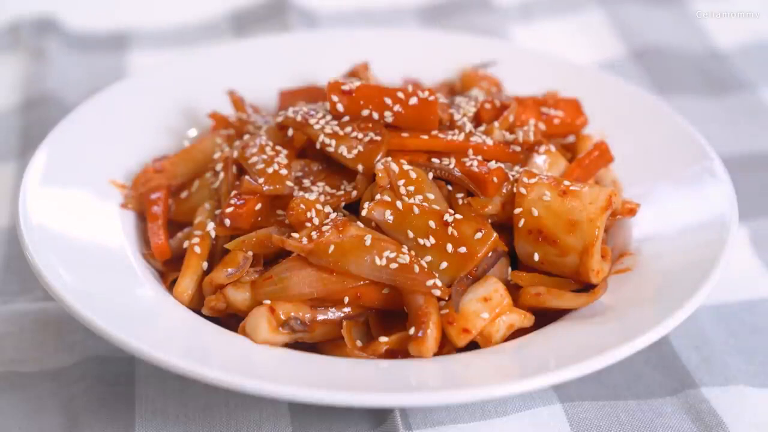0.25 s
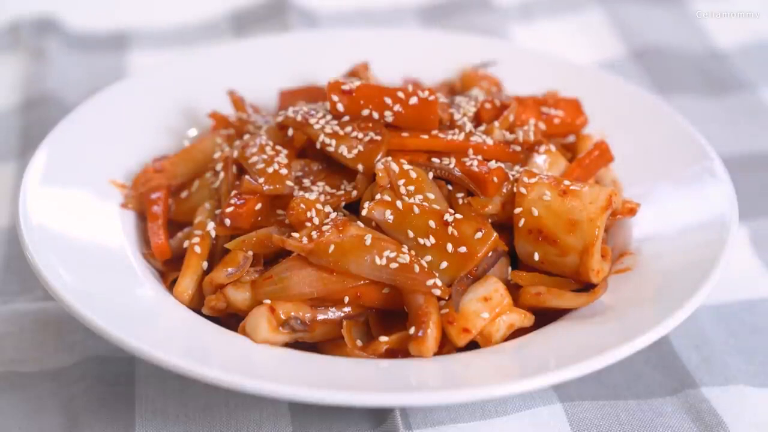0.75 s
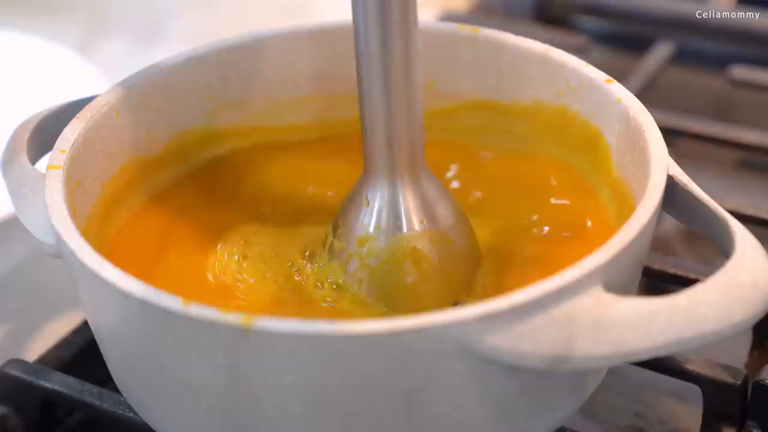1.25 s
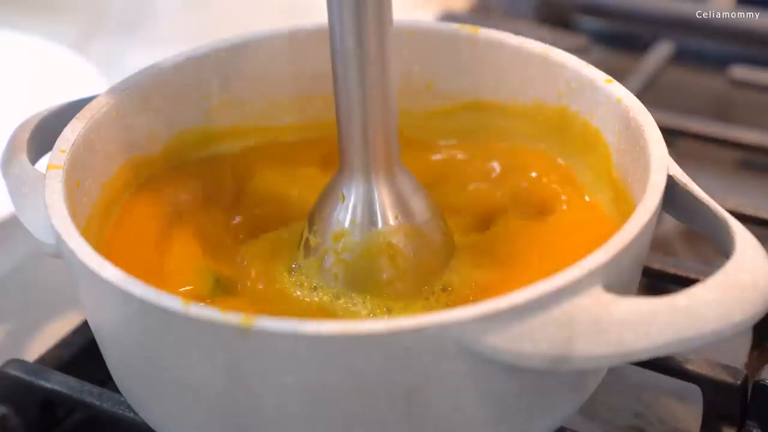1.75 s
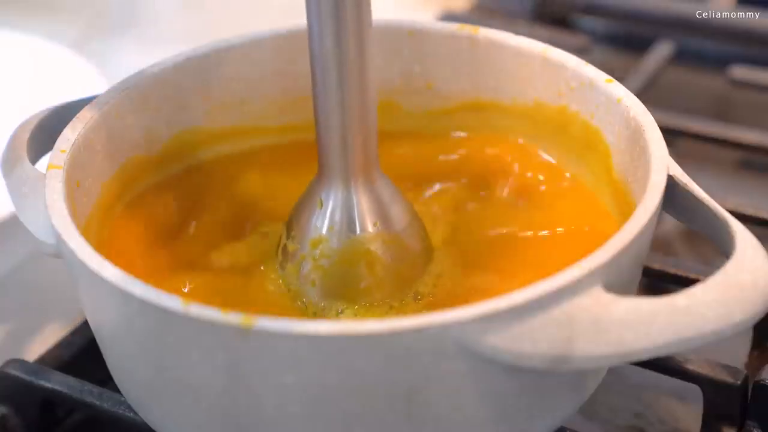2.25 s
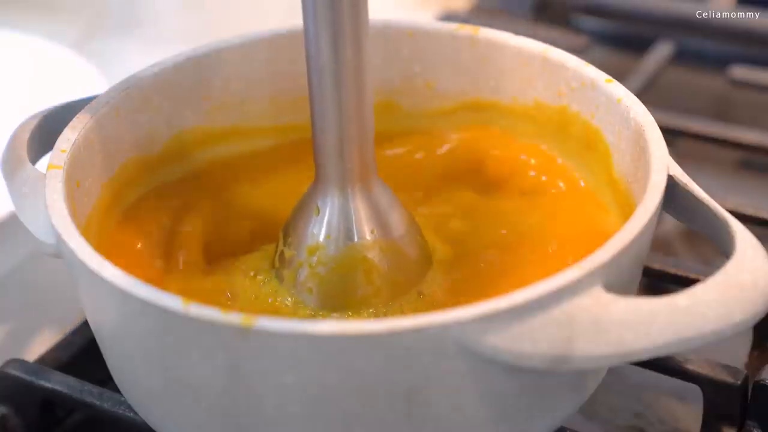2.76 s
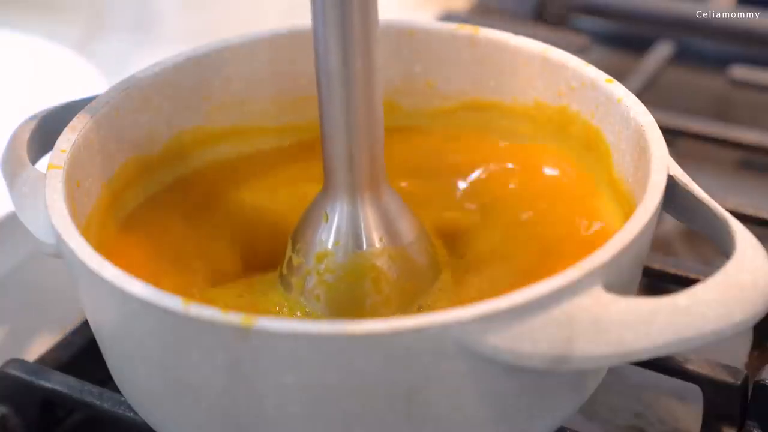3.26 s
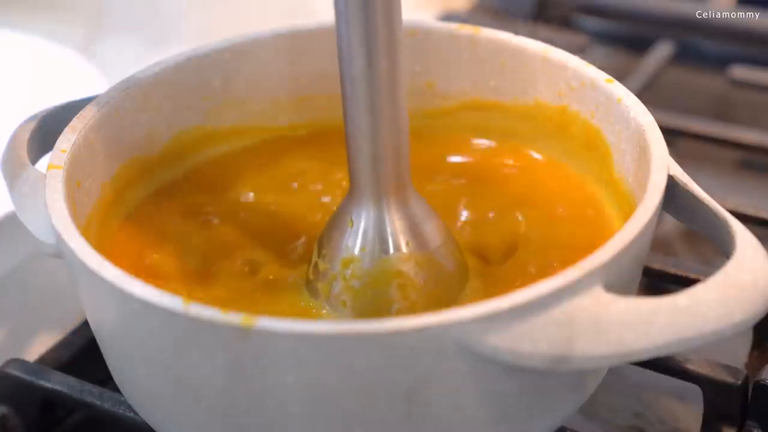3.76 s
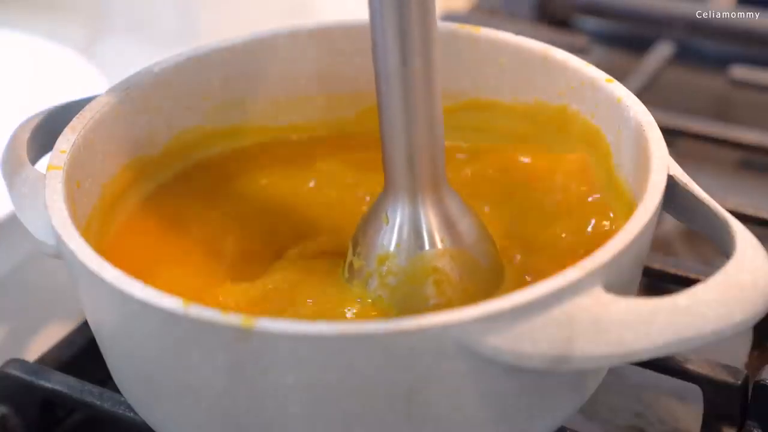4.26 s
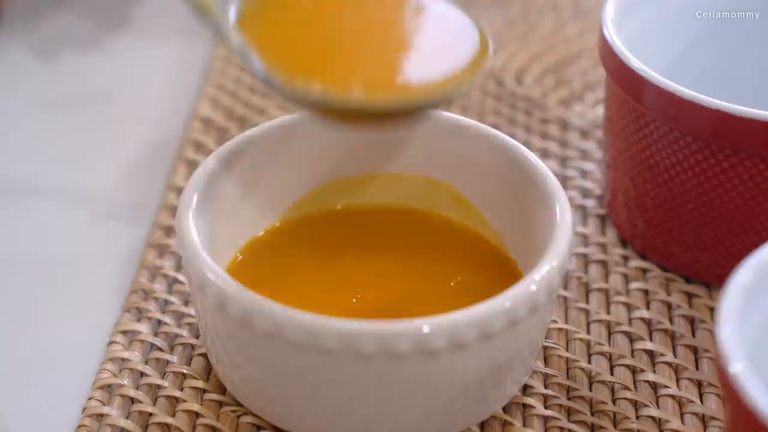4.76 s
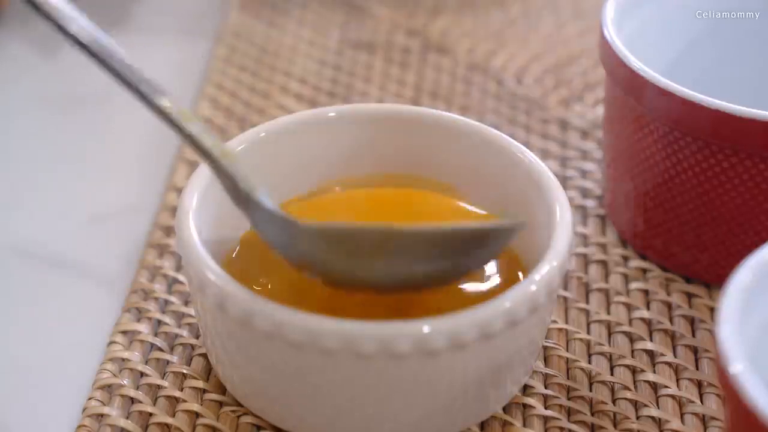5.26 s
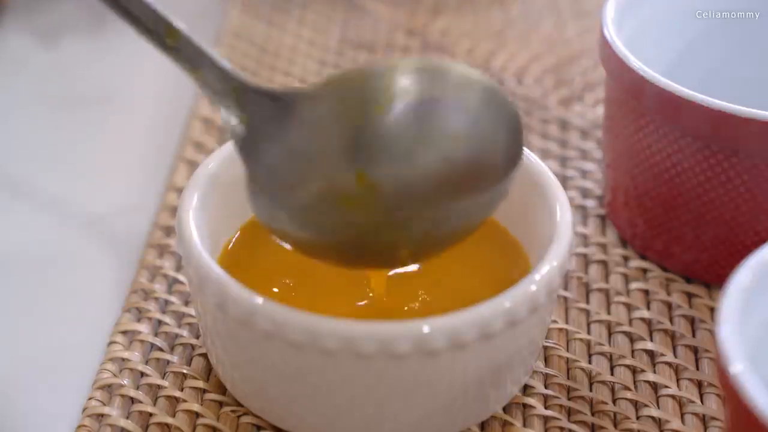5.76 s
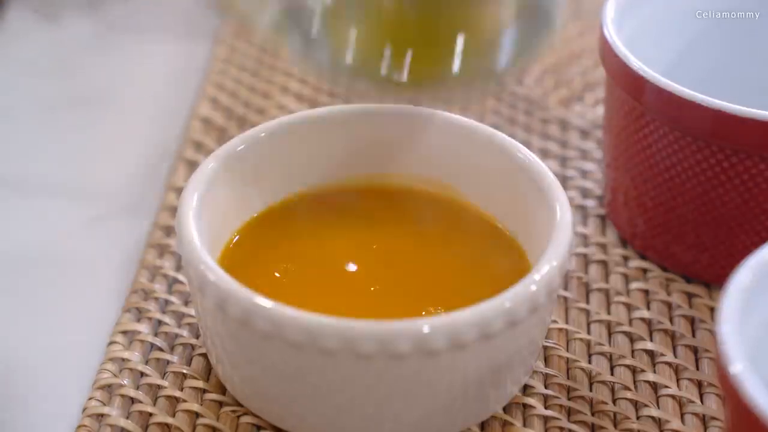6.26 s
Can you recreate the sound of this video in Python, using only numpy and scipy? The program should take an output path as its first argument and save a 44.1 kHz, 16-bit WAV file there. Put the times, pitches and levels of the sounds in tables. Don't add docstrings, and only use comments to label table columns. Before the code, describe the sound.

A hushed room gives way suddenly to a steady blender roar in a pot, which cuts off to humming room noise, light sizzle and pouring drips.

```python
import sys
import numpy as np
from scipy import signal
from scipy.fft import rfft, irfft, next_fast_len
from scipy.io import wavfile

SR = 44100
rng = np.random.default_rng(int(sys.argv[2]) if len(sys.argv) > 2 else 0)


def store_wav(level_fs):
    pcm = np.round(np.clip(np.atleast_2d(level_fs), -1, 1) * 32767)
    wavfile.write(sys.argv[1], SR, pcm.T.astype(np.int16))


def elevation(decibels):
    levels = np.asarray(decibels, float)
    return 10 ** (levels / 20)


N = 287388
TIME = np.arange(N) / SR
START_S, STOP_S = 1.3468, 4.6005

# hz, likeness of left and right (-1 to 1); then hz, left_over_right_db
ROOM_LIKENESS = [(60, 1.0), (130, 0.99), (290, 0.97), (640, 0.71), (1410, 0.31), (3100, -0.13),
                 (6820, -0.06), (15000, 0.05)]
ROOM_BALANCE = [(60, 0.0), (150, -0.5), (380, -1.0), (950, -2.0), (2380, -2.0), (5980, -2.5), (15000, -3.0)]
# hz, level_db per Hz
QUIET_COLOUR = [(25, -48), (42, -25), (60, -9), (80, -19), (150, -14), (215, -4.5), (310, -4), (450, -8),
                (900, -6.5), (1400, -12), (2100, -16), (4000, -19), (8000, -21.5), (15000, -27)]
# pitch_hz, level_db
QUIET_TONES = [(129.2, -79), (209.9, -72), (236.9, -84), (317.6, -72.5), (597.5, -88), (753.7, -78),
               (1039, -76.5), (1130, -86), (1545, -82), (2024, -87), (4581, -84), (6245, -91)]
# start_s (middle of burst), level_db,
# pitch_hz, width_hz,
SPITS = [(.783, -55, 4900, 1800, .004), (2.2975, -31, 10400, 5000, 0.0023), (2.3, -56, 15100, 1200, 0.037),
         (1.97, -64, 14900, 500, .03), (2.96, -67, 15500, 500, .02), (4.1, -64, 14900, 500, .02),
         (4.23, -62, 14900, 500, .04), (4.3, -67, 15600, 300, .03), (4.44, -38, 9000, 3000, 0.015),
         (5.458, -42, 3200, 2000, .002), (5.5665, -32, 4900, 2600, 0.0022), (6.49, -41, 1250, 600, 0.012),
         (4.91, -48, 8800, 1500, 0.055), (5.39, -41, 6700, 1200, 0.015), (6.07, -44, 7400, 1200, 0.014),
         (6.309, -46, 2600, 1500, 0.082)]
# start_s, peak_db, pitch_hz, t60_s
TICKS = [
    (1.346, -44, 45, 0.037),
    (5.124, -38, 2950, .025),
    (5.456, -30, 2800, 0.013),
    (5.566, -25, 4140, 0.0065),
    (6.478, -31, 1180, 0.023),
    (6.4815, -32, 1200, 0.035),
    (6.489, -30, 1120, .025),
    (6.502, -35, 1030, 0.018),
]

# time_s, speed in turns per s
SHAFT_SPEED = [(1.347, 95.5), (1.72, 95.62), (1.9, 95.25), (2.12, 95.56), (2.3, 95.25), (2.4, 94.88),
               (2.85, 94.58), (3.62, 95.38), (3.84, 96.14), (4.02, 95.95), (4.2, 95.15), (4.4, 95.65),
               (4.6, 95.7)]
# time_s, lean (0-1)
LEAN = [
    (1.347, .25),
    (2.3, .3),
    (2.55, .0),
    (3.0, .08),
    (3.3, .6),
    (3.55, .95),
    (4.6, .95),
]
MULTIPLES = (3, 5, 6, 7, 10, 12, 24, 26, 27, 46, 49, 50, 53, 54, 56, 59, 62, 66, 67, 76, 86, 96, 97, 107,
             120, 144)
MULTIPLE_DB = (-41, -49, -42, -43, -47, -40, -49, -52, -50, -54, -53, -56, -52, -56, -60, -58, -58, -62,
               -59, -63, -65, -58, -61, -64, -62, -66)
LEADING = (4, 47, 48, 72)
# time_s, level_db
GULPS = [
    (2.44, -10),
    (2.9, -8.5),
    (3.7, -6.5),
    (4.18, -3),
    (4.43, -3),
]
# hz, level_db per Hz
CHURN_COLOUR = [(30, -70), (55, -42.5), (150, -36.5), (235, -13.5), (520, -10.5), (610, -12.5), (700, -0.5),
                (1000, -5.5), (1800, -7.5), (3300, -10.5), (3900, -19.5), (6000, -19), (9000, -25),
                (11400, -30.5), (12300, -33), (13900, -31.5)]
# pitch_hz, width_hz, level_db
POT = [(240, 15, 4), (390, 35, 4.5), (730, 86, -8), (835, 39, 6), (1200, 130, 4), (1556, 76, 7),
       (3357, 74, 1.5), (4370, 870, 2), (7050, 160, -0.5), (9620, 560, -0.5), (11100, 300, -2)]
# hz, likeness of left and right (-1 to 1); then hz, left_over_right_db
CHURN_LIKENESS = [(60, 0.99), (130, 1), (290, 0.99), (640, 0.95), (1410, 0.72), (3100, 0.5), (6820, 0.54),
                  (12500, 0.19)]
CHURN_BALANCE = [(60, 0.0), (150, 1), (380, -1.2), (950, -1), (2380, -2), (5980, -1.5), (9000, -6.5),
                 (14000, -0.5)]
# low_hz, high_hz, rarity (0-3)
BLENDER_DROPPED = [(10400, 10650, 1.5), (10900, 11150, 1.4), (11650, 11900, .6), (11900, 12150, .1),
                   (12150, 12400, .2), (12400, 12650, .6), (12650, 12900, .5), (12900, 13150, .7),
                   (13300, 13500, 1.3), (13950, 14200, 1.0)]

# hz, level_db per Hz
HUM_COLOUR = [(25, -50), (45, -36), (88, -34), (110, -19), (150, -15), (200, -3.5), (260, -9.5), (320, 2.5),
              (480, -4.5), (800, -3.5), (1200, -4.5), (1700, -7.5), (3000, -13), (15000, -21)]
# pitch_hz, level_db
HUM_TONES = [(59.2, -70), (107.7, -72.5), (161.5, -75), (177.6, -61.5), (215.3, -59.5), (296.1, -56),
             (317.6, -56), (425.3, -58), (489.9, -68.5), (775.2, -62.5), (850.6, -64.5), (893.6, -85),
             (1012, -72), (1190, -64.5), (1545, -71), (2019, -70), (2379, -69)]
# hz, level_db per Hz
SIZZLE_COLOUR = [(1500, -19), (2500, -6.5), (4000, -3), (6300, 0), (7500, -1.5), (9000, -5.5), (12000, -12),
                 (15500, -22)]
# low_hz, high_hz, rarity (0-3)
ROOM_DROPPED = [(2700, 2900, 1.9), (3000, 3150, 1.6), (3300, 3550, 1.7), (3650, 3800, 1.7),
                (4050, 4250, 1.8), (4900, 5050, 2.0)]


def in_time(rows, t):
    s, *columns = np.transpose(rows)
    return [np.interp(t, s, c) for c in columns]


def at_hz(points, hz):
    points = np.array(points)
    return np.interp(np.log(hz), np.log(points[:, 0]), points[:, 1])


def rms_one(x):
    return x / np.sqrt(np.mean(x ** 2) + 1e-20)


def drift(rate_hz, size):
    r = np.exp(-64 * np.pi * rate_hz / SR)
    noise = rng.standard_normal(size // 32 + 3002)
    slow = signal.lfilter([1], [1, -2 * r, r * r], noise)[3000:]
    return np.interp(np.arange(size) / 32, np.arange(len(slow)), rms_one(slow - slow.mean()))


def tilt_sides(hz, balance):
    return elevation(at_hz(balance, hz) * np.array([[.5], [-.5]]))


def sides(mid, side, hz, likeness, balance):
    alike = np.clip(at_hz(likeness, hz), -.99, 1)
    pair = np.sqrt(1 + alike) * mid + np.sqrt(1 - alike) * side * [[1], [-1]]
    return pair * tilt_sides(hz, balance)


def banded_noise(size, spectrum, likeness, balance, own_db, shared_db, modes=(), tilt_db=0, boom_db=0, lumps_db=0):
    pad = next_fast_len(size)
    hz = np.maximum(np.fft.rfftfreq(pad, 1 / SR), 1)
    power = 1 + sum(elevation(2 * db) / (1 + (2 * (hz - f) / width) ** 2) for f, width, db in modes)
    white = rfft(rng.standard_normal((2, pad))) * elevation(at_hz(spectrum, hz)) * np.sqrt(power)
    out = 0
    for centre in 30 * 2 ** np.arange(0, 9.6, .5):
        share = np.cos(np.pi / 2 * np.clip(2 * np.log2(hz / centre), -1, 1)) ** 2
        mid, side = irfft(white * share, pad)[:, :size]
        treble = np.clip(np.log2(centre / 3500), 0, 1)
        boom = np.clip(1 - np.abs(2 * np.log2(centre / 780)), 0, 1)
        gain_db = own_db * drift(16.6, size) + shared_db
        gain_db = gain_db + lumps_db * (0.5 - treble) * drift(30.0, size)
        gain_db = gain_db + treble * tilt_db + 2.2 * boom * boom_db
        out = out + elevation(gain_db) * sides(mid, side, centre, likeness, balance)
    return rms_one(out)


def tone(turns, level_db, hz, wander_db, likeness, balance):
    size = len(turns)
    angle = 2 * np.pi * (turns + rng.random()) + 0.26 * drift(4.1, size)
    wave = np.exp(1j * angle) * elevation(level_db + wander_db * drift(11.4, size))
    wave = wave * elevation(3.5) / np.sqrt(1 + np.clip(at_hz(likeness, hz), 0, 1))
    return sides(wave.real, wave.imag * drift(2.0, size), hz, likeness, balance)


def dropouts(x, bands):
    size = x.shape[1]
    spectrum, hz, out = rfft(x), np.fft.rfftfreq(size, 1 / SR), x.copy()
    for low, high, rarity in bands:
        shut = np.clip(8 * (drift(7, size) - rarity), 0, 1)
        out -= shut * irfft(spectrum * ((hz >= low) & (hz < high)), size)
    return out


def room(t, spectrum, level_db, tones):
    place = (ROOM_LIKENESS, ROOM_BALANCE)
    air = banded_noise(len(t), spectrum, *place, own_db=-0.94, shared_db=0)
    return elevation(level_db) * air + sum(tone(hz * t, db, hz, .7, *place) for hz, db in tones)


def spits():
    out = np.zeros((2, N))
    for s, db, hz, width, length in SPITS:
        edges = np.clip([hz - width / 2, hz + width / 2], 200, 20000)
        band = signal.butter(2, edges, "band", fs=SR, output="sos")
        burst = rms_one(signal.sosfilt(band, rng.standard_normal((2, 8000))))
        t, at = (np.arange(8000) - 4000) / SR, round(s * SR) - 4000
        burst = elevation(db) * burst * np.exp(-.5 * (2 * t / length) ** 2)
        out[:, at:at + 8000] += burst[:, :N - at]
    return out


def ticks():
    out = np.zeros((2, N))
    t = np.arange(round(.06 * SR)) / SR
    for s, db, hz, t60 in TICKS:
        ring = np.sin(2 * np.pi * hz * t) + 0.13 * np.sin(2 * np.pi * 0.86 * hz * t)
        rise_s = 0.0013 * 1200 / max(hz, 1200)
        ring = ring * elevation(db - 60 * t / t60) * np.minimum(t / rise_s, 1)
        at = round(s * SR)
        out[:, at:at + len(t)] += (ring * tilt_sides(hz, ROOM_BALANCE))[:, :N - at]
    return out


def motor_lines(t, turns, shaken, speed, lean, free):
    place, mean_speed = (CHURN_LIKENESS, CHURN_BALANCE), speed.mean()
    flutter_db = 2.3 * np.cos(2 * np.pi * (120 * t - turns) - .8) / 48
    lines = sum(tone(k * shaken, db + min(k, 48) * flutter_db, k * mean_speed, .8 + .02 * k, *place)
                for k, db in zip(MULTIPLES, MULTIPLE_DB))
    gulp_db = sum(db * np.exp(-((t - s) / 0.053) ** 2) for s, db in GULPS)
    blade_db = -37.5 + 4 * lean + gulp_db
    wobble_db = -47.5 + 8 * lean
    bars_db = -40.5 - 16 * lean
    cover_db = -50.5 - 10 * np.log10(1 + (2 * (LEADING[-1] * speed - 6868) / 60) ** 2)
    return lines + sum(tone(k * shaken, db + min(k, 48) * flutter_db, k * mean_speed, 0.83, *place)
                       for k, db in zip(LEADING, (blade_db, wobble_db, bars_db, cover_db)))


def puree_churn(turns, lean, free, surge_db):
    size = len(turns)
    throb_db = 0.51 * np.cos(2 * np.pi * turns) + 0.39 * np.cos(4 * np.pi * turns) + 1.0 * drift(98, size)
    spray_db = 0.2 * free - surge_db
    boom_db = 0.3 * (lean - 3.0) + 0.85 * surge_db
    return banded_noise(size, CHURN_COLOUR, CHURN_LIKENESS, CHURN_BALANCE, own_db=1.0, shared_db=throb_db,
                        modes=POT, lumps_db=0.7, tilt_db=spray_db, boom_db=boom_db)


def bearing_roughness(shaken, mean_speed):
    k = np.arange(1, 152)
    unused = ~np.isin(k, [*MULTIPLES, *LEADING])
    level = elevation(at_hz(CHURN_COLOUR, k * mean_speed) + 2.5 * rng.standard_normal(len(k)))
    phase = np.exp(2j * np.pi * rng.random(len(k)))
    one_turn = irfft(np.r_[0, unused * level * phase], 2048)
    one_turn = rms_one(np.r_[one_turn, one_turn[0]])
    return np.interp(shaken % 1, np.arange(2049) / 2048, one_turn)


def blender(t):
    (speed,), (lean,) = in_time(SHAFT_SPEED, t), in_time(LEAN, t)
    free = speed - 95.4
    turns = np.cumsum(speed) / SR
    beat = 2 * np.pi * (120 * t - turns)
    shaken = turns + .0007 * np.sin(beat - 2) + .0009 * drift(25.0, len(t))
    surge_db = 1.3 * np.clip((t - 3.92) / 0.24, 0, 1)
    roar_db = -26 + 1.07 * free - 0.9 * (lean - .5) + surge_db
    lines = motor_lines(t, turns, shaken, speed, lean, free)
    churn = puree_churn(turns, lean, free, surge_db)
    rough = bearing_roughness(shaken, speed.mean())
    mix = lines + elevation(roar_db) * (elevation(.5) * churn + elevation(-11.0) * rough)
    top_cut = signal.ellip(10, .5, 80, 14420, fs=SR, output="sos")
    return dropouts(signal.sosfilt(top_cut, mix), BLENDER_DROPPED)


def sizzle(t, level_db):
    crackle_db = 0.44 * drift(140, len(t))
    hiss = banded_noise(len(t), SIZZLE_COLOUR, ROOM_LIKENESS, ROOM_BALANCE, own_db=0.6, shared_db=crackle_db)
    return elevation(level_db) * hiss


def scene():
    start, stop = round(START_S * SR), round(STOP_S * SR)
    before, during, after = TIME[:start], TIME[start:stop], TIME[stop:]
    quiet = room(before, QUIET_COLOUR, -57, QUIET_TONES)
    quiet = quiet * np.clip((START_S - .004 - before) / 0.0083, 0, 1)
    running = blender(during) * np.clip((during - START_S) / .003, 0, 1)
    running += elevation(-73) * np.sin(2 * np.pi * 73.0 * during)
    sizzle_db = -43 - 0.5 * (after - STOP_S)
    ladling = room(after, HUM_COLOUR, -43.5, HUM_TONES) + sizzle(after, sizzle_db)
    moments = [quiet, running, dropouts(ladling, ROOM_DROPPED)]
    return np.concatenate(moments, axis=1) + spits() + ticks()


def band_limit(x):
    return signal.sosfilt(signal.butter(12, 15740, fs=SR, output="sos"), x)


def record(dry):
    return band_limit(dry)


dry = scene()
out = record(dry)
store_wav(out)
```